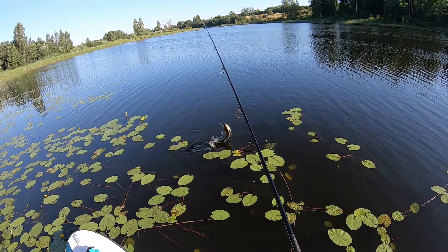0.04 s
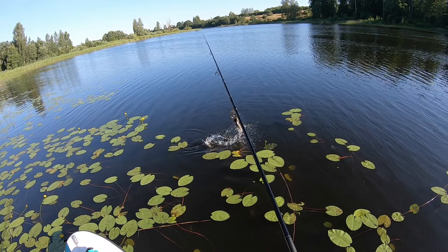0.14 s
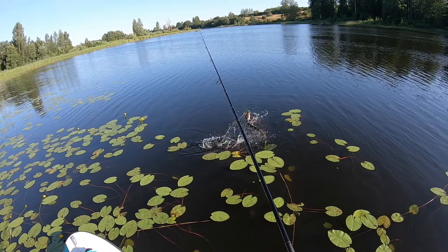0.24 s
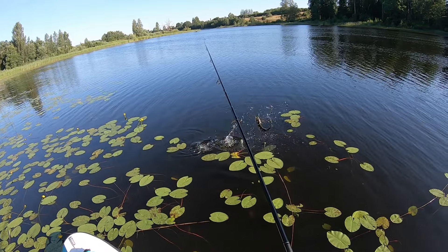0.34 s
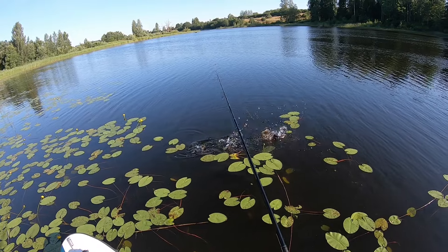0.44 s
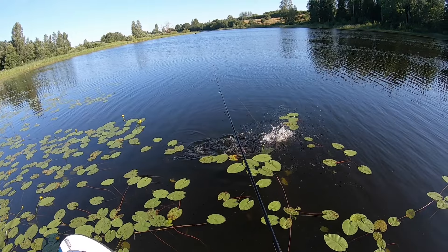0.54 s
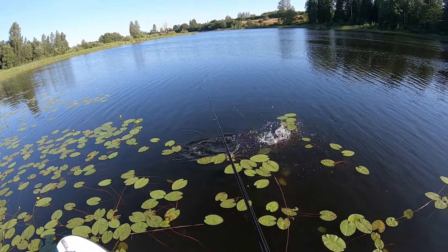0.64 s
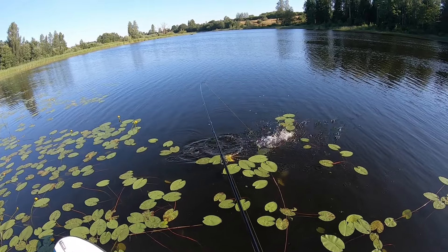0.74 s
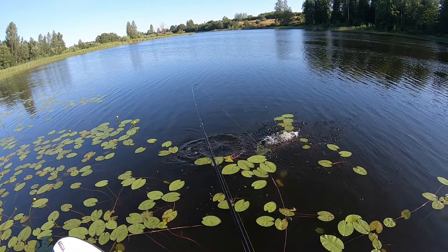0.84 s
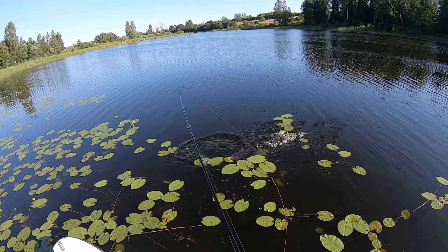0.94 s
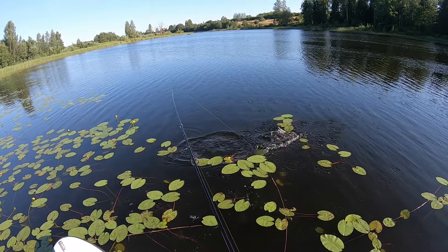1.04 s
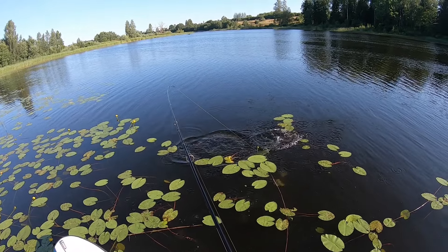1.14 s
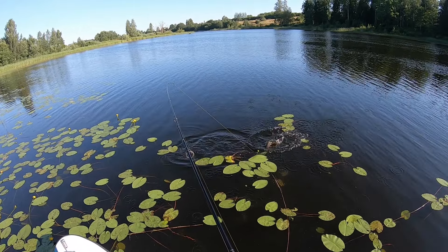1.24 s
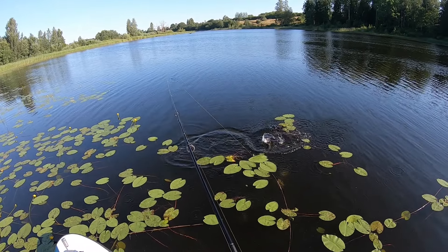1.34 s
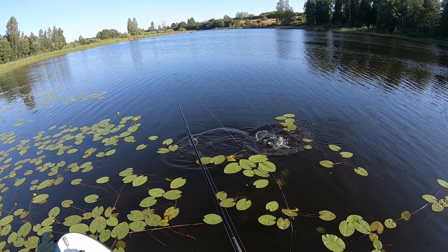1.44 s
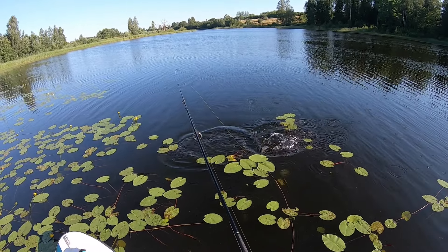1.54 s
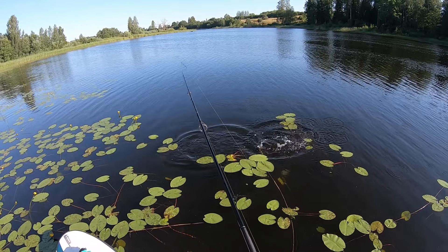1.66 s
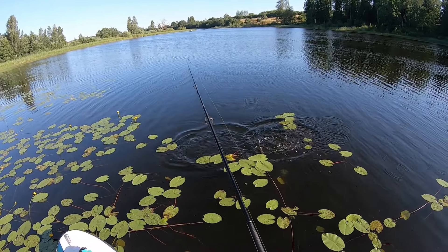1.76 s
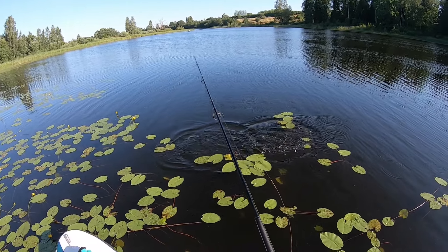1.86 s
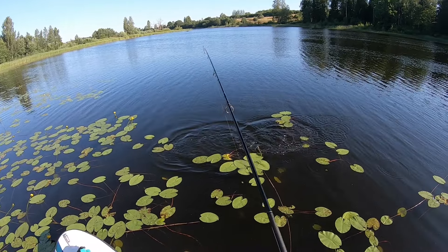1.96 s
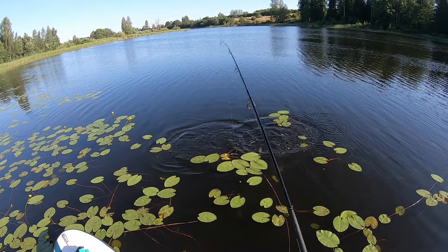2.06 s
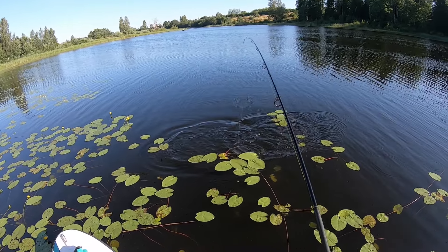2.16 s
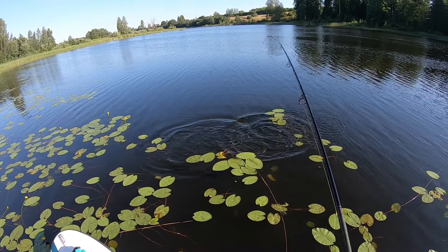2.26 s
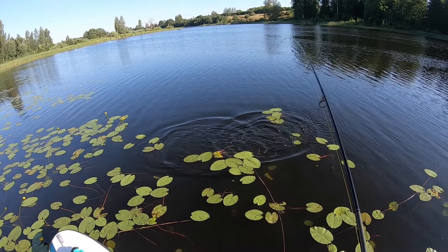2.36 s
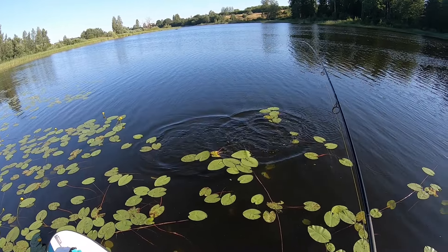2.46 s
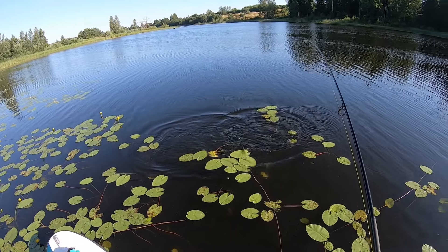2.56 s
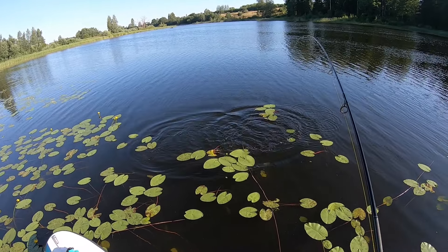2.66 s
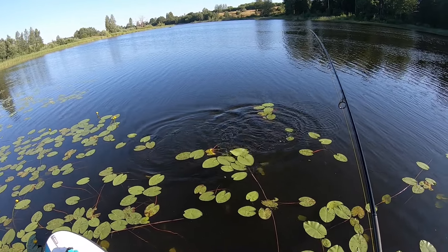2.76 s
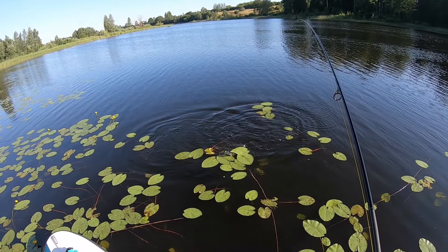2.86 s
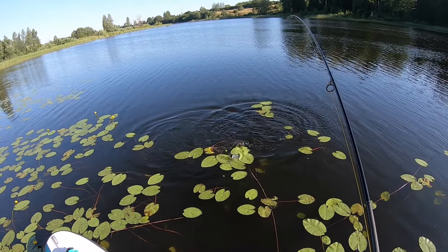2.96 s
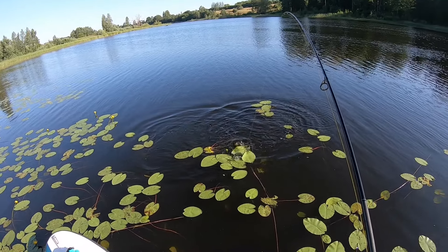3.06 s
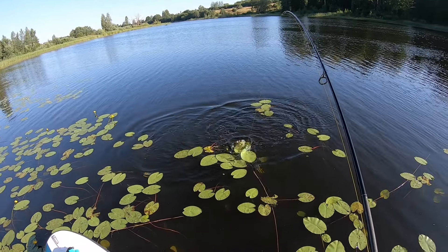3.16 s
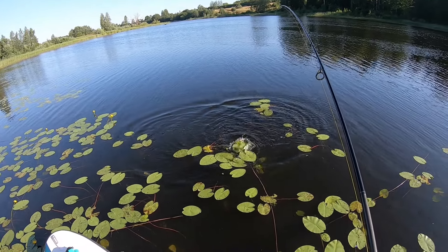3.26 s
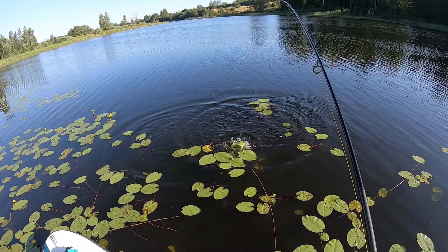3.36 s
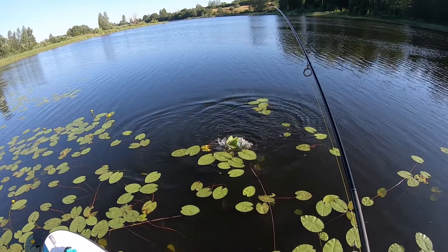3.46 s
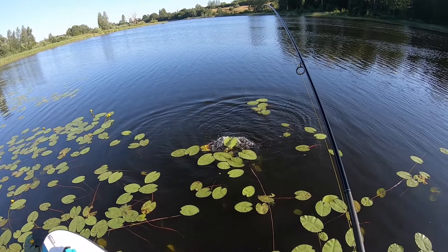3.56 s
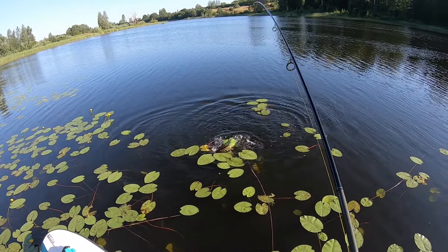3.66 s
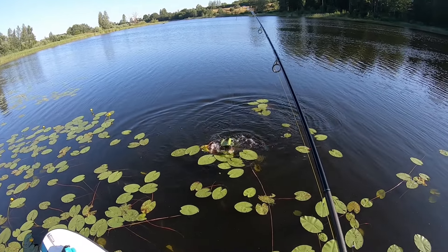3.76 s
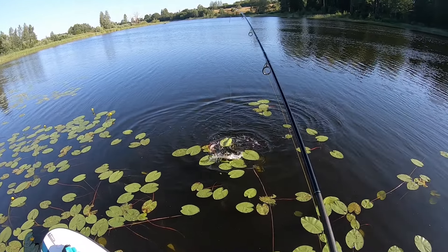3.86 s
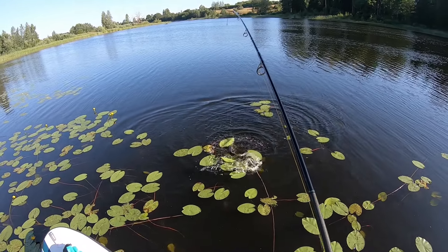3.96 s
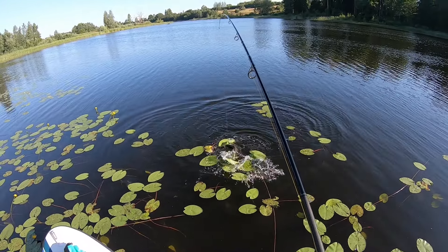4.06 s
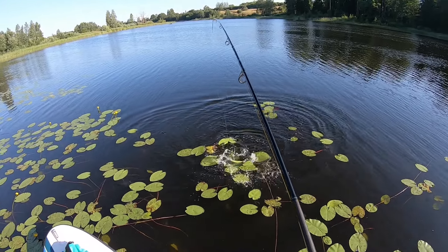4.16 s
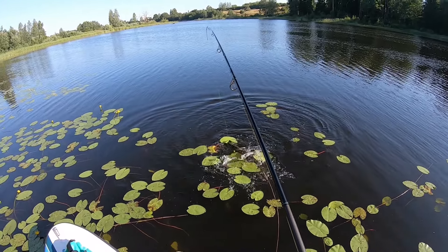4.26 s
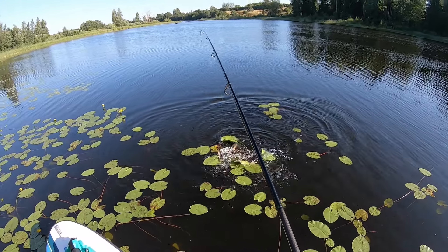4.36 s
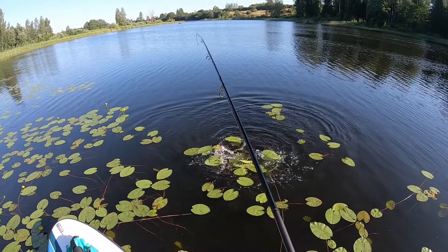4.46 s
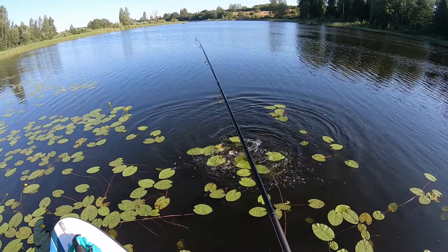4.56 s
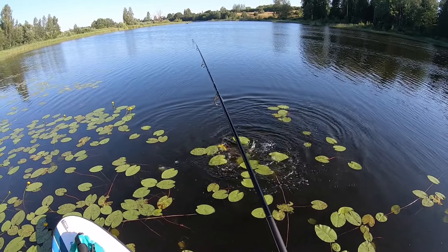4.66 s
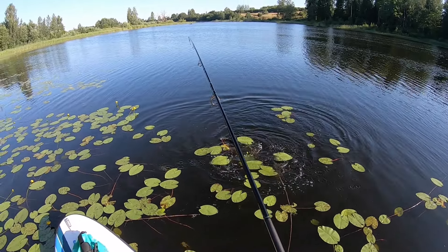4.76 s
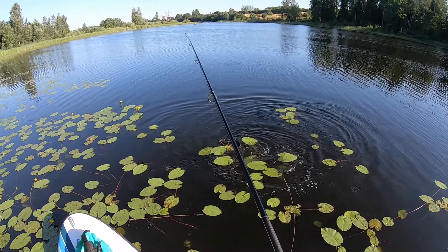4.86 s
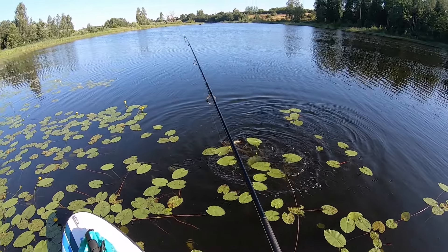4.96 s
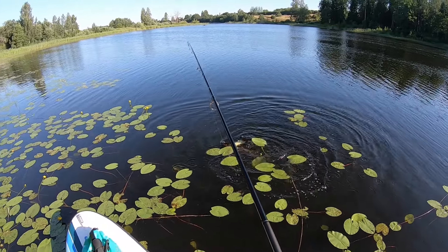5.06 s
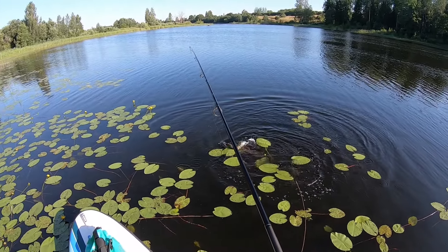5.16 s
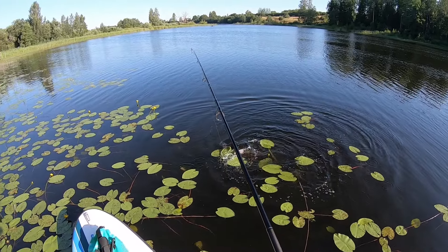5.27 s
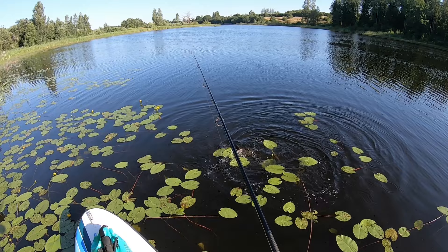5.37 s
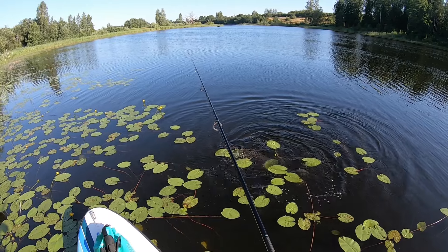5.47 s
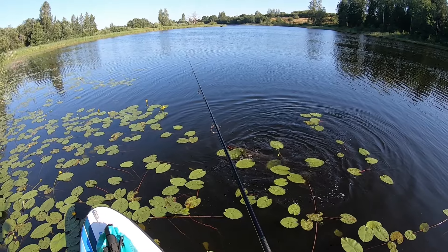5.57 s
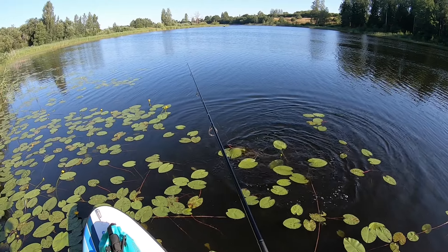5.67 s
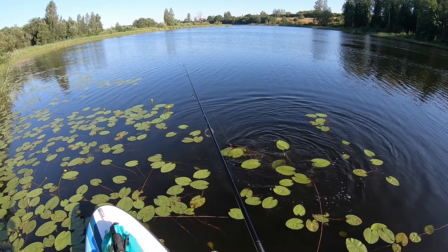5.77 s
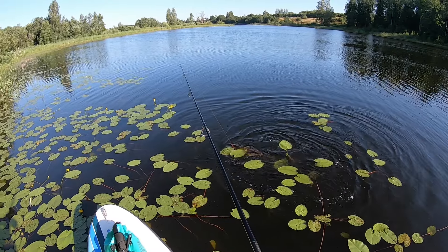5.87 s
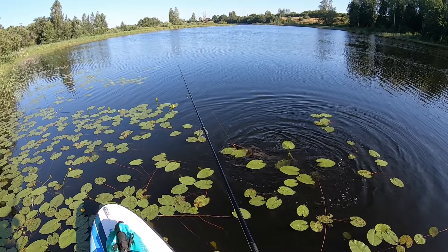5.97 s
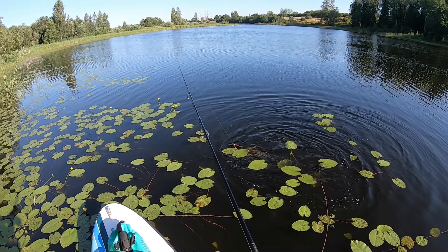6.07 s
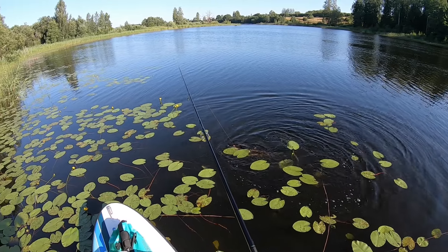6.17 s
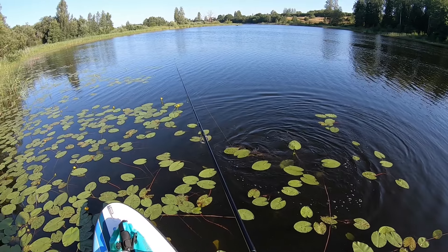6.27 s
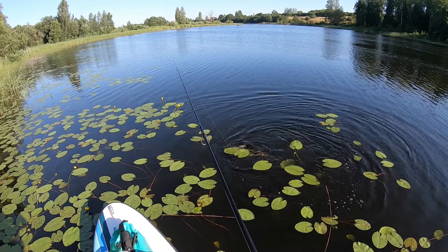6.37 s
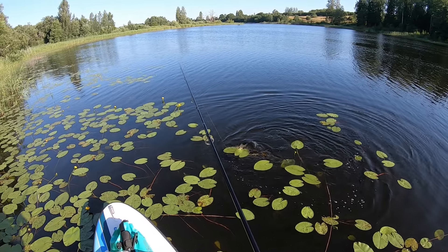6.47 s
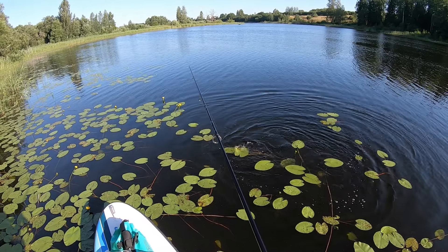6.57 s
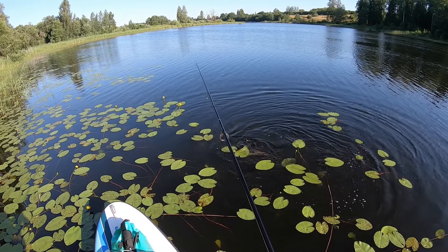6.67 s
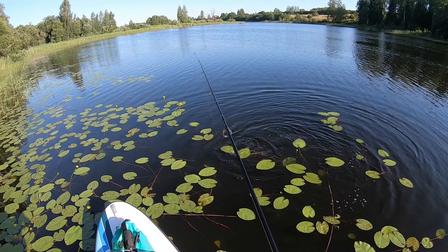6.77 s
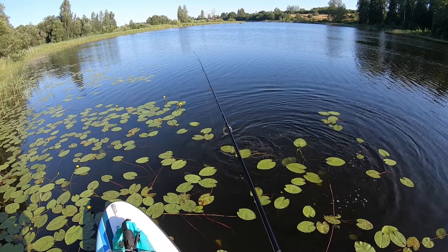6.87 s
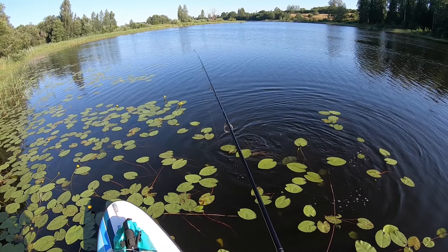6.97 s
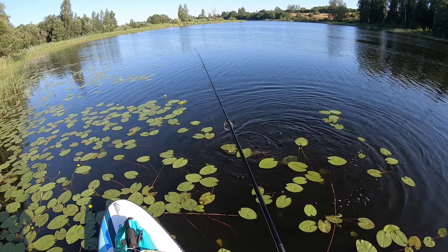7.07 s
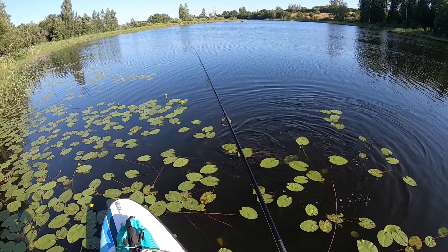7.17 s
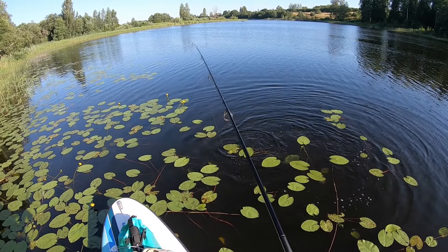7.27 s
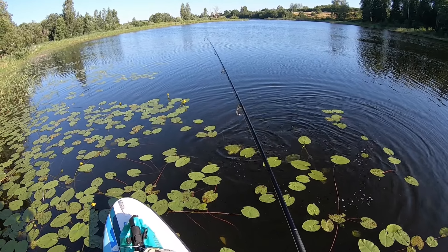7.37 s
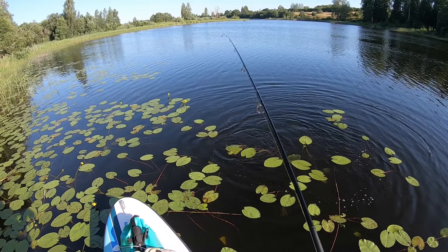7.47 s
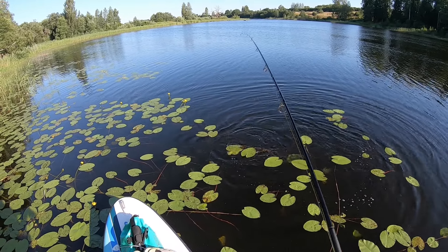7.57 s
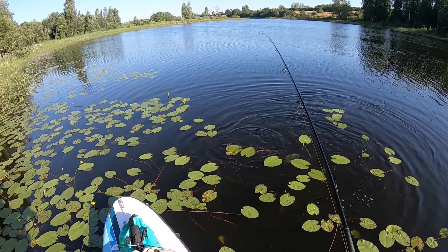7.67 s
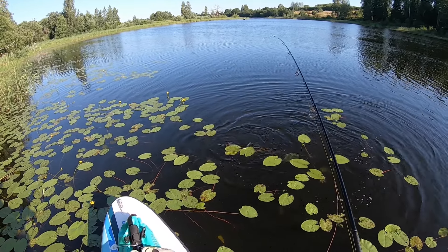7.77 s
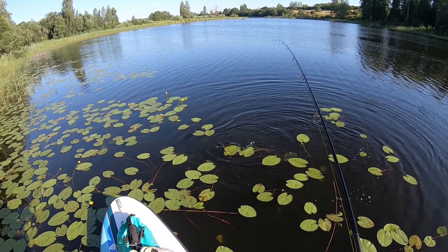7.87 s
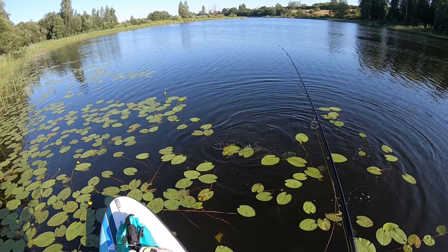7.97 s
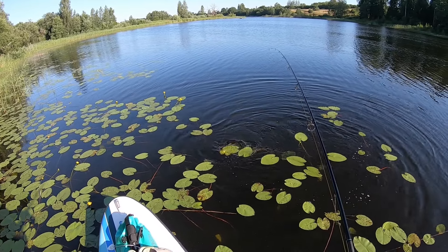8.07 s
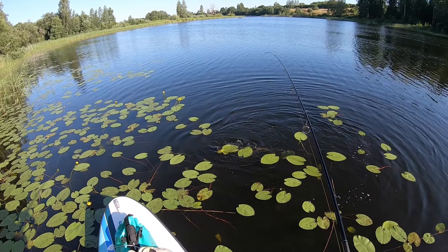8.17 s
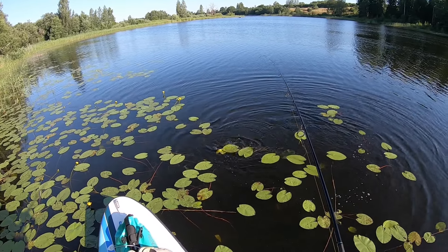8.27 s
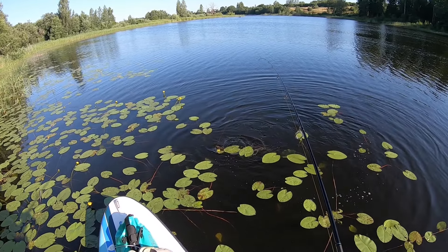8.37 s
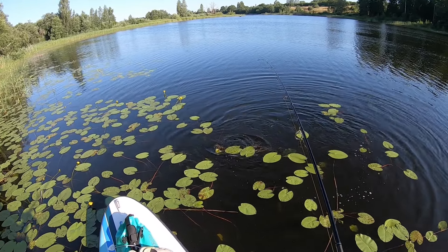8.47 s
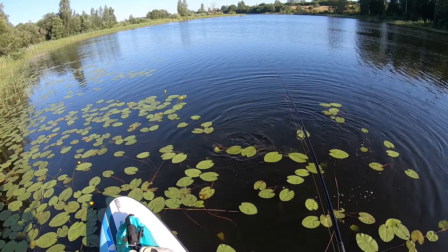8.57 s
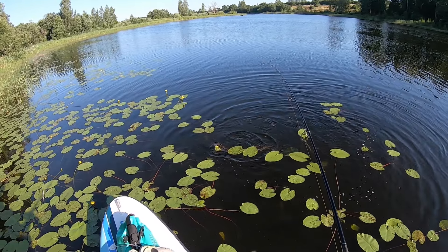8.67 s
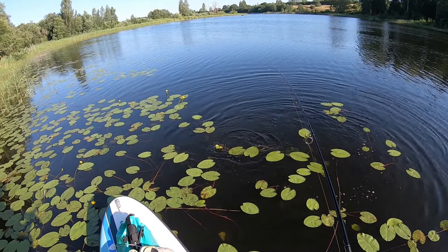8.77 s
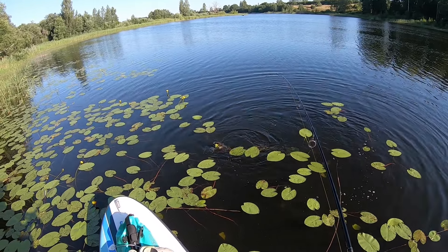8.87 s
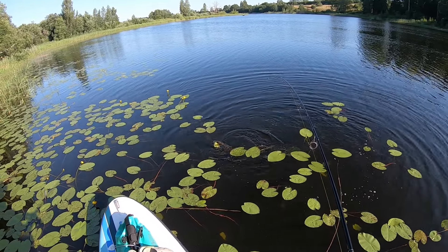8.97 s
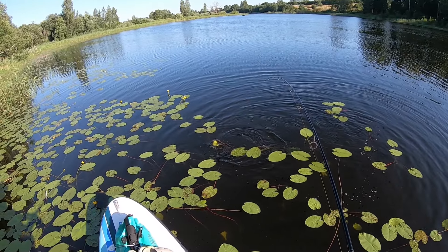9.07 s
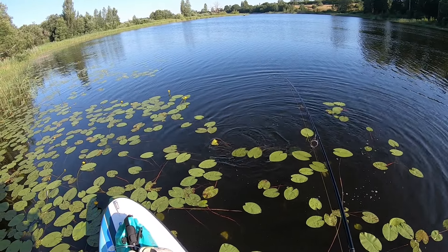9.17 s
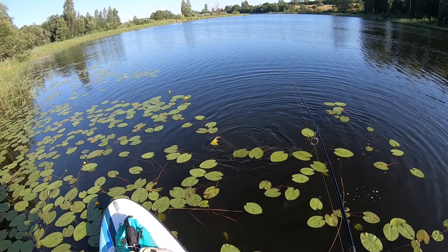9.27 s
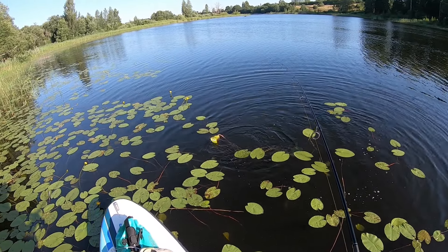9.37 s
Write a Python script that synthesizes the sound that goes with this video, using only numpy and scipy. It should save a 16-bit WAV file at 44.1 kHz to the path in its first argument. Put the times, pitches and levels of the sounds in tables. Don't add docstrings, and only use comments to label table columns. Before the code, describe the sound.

Outdoor stereo capture a few metres from a struggling fish: sharp splash and deep slosh first, spray raining back, bubbles rising. A lull with faint bird chirps follows, then renewed churning, wet pad slaps and hollow plops. The water calms to isolated ticks and drips, with thin far whistles. A soft low hum, distant traffic and slight wind rumble lie underneath, with no room echo.

```python
import sys
import numpy as np
from scipy import signal
from scipy.fft import rfft, irfft, next_fast_len
from scipy.io import wavfile
from scipy.ndimage import uniform_filter1d

SR = 44100
rng = np.random.default_rng(int(sys.argv[2]) if len(sys.argv) > 2 else 0)


def unload_wav(signal):
    wavfile.write(
        sys.argv[1],
        SR,
        np.round(np.clip(np.atleast_2d(signal).T, -1, 1) * 32767).astype(np.int16),
    )


def voltage_ratio(level):
    return 10 ** (np.asarray(level, float) / 20)


N = 415422


def evened(x):
    return x / np.sqrt(np.mean(x ** 2) + 1e-20)


def read(points, hz):
    f, value = np.transpose(points)
    return np.interp(np.log(hz + 1), np.log(f + 1), value)


def along(rows, axis=1):
    rows = np.array(rows)
    return np.interp(np.arange(N) / SR, rows[:, 0], rows[:, axis])


def colour(x, response):
    size = next_fast_len(N + 4096)
    return irfft(rfft(x, size) * response(np.fft.rfftfreq(size, 1 / SR)), size)[..., :N]


def noise(points):
    return evened(colour(rng.standard_normal(N), lambda hz: voltage_ratio(read(points, hz))))


def add(mix, s, sound):
    part = mix[round(s * SR):][:len(sound)]
    part += sound[:len(part)]


def spread(mid, side):
    lean_db = -2.5
    return np.array([mid + side, mid - side]) * voltage_ratio(np.array([[lean_db / 2], [-lean_db / 2]]))


# time_s, level_db
AIR_LEVEL = [(0, -73.5), (2.2, -63), (2.8, -68.5), (5.9, -68), (6.6, -65), (7.3, -68.5), (9.42, -67.5)]
# pitch_hz, density_db
AIR_SUM = [(90, -50.5), (120, -27.5), (150, -8.5), (230, -17.5), (330, -20.5), (430, -25), (620, -25),
           (800, -19.5), (1000, -24), (1920, -28), (4500, -33.5), (8480, -46), (15500, -66.5)]
# pitch_hz, density_db
AIR_DIFFERENCE = [(53, -82.5), (90, -45.5), (183, -5), (288, -15), (321, -22.5), (846, -11), (1030, -13.5),
                  (1920, -20.5), (15500, -49.5)]


def air():
    side_db = 2
    swell = voltage_ratio(.6 * noise([(0, 0), (3, -3), (10, -40)]))
    return voltage_ratio(along(AIR_LEVEL)) * swell * spread(noise(AIR_SUM), voltage_ratio(side_db) * noise(AIR_DIFFERENCE))


# time_s, level_db
ENGINE_LEVEL = [(0, -62.5), (.3, -60), (.9, -68.5), (2.2, -68), (4.8, -69.5), (6.6, -62), (9.42, -64.5)]


def hum():
    pitch_hz, width_hz, steady_share = 185.5, 9.0, .55
    r = np.exp(-np.pi * width_hz / SR)
    fuzz = signal.lfilter([1], [1, -r], rng.standard_normal(N) + 1j * rng.standard_normal(N))
    fuzz = steady_share + (1 - steady_share) * fuzz / np.std(fuzz)
    tone = evened((fuzz * np.exp(2j * np.pi * pitch_hz * np.arange(N) / SR)).real)
    return spread(voltage_ratio(along(ENGINE_LEVEL)) * tone, 0)


# time_s, level_db
WIND_LEVEL = [(0, -73), (.23, -49.5), (.63, -51.5), (.81, -62), (2.0, -66.5), (4.0, -68.5), (4.6, -68),
              (9.42, -72.5)]
# pitch_hz, density_db
GUST_SPECTRUM = [(12, 1), (25, 2), (50, -7.5), (75, -16), (110, -23.5), (170, -68)]


def wind():
    side_db = 9
    push = noise(GUST_SPECTRUM)
    lumps = voltage_ratio(4.2 * noise([(0, -1.5), (6, 4.5), (16, -51.5)]))
    mid = 0.96 * noise(GUST_SPECTRUM) - 0.107 * push
    return voltage_ratio(along(WIND_LEVEL)) * lumps * spread(mid, voltage_ratio(side_db) * push)


# time_s, level_db
ROAD_LEVEL = [(0, -75), (1.8, -76.5), (2.3, -73.5), (5.9, -78), (6.7, -70), (7.6, -76.5), (8.4, -85),
              (8.9, -73), (9.42, -74.5)]


def road():
    side_db = -9.5
    band = [(200, -30), (260, 0.5), (370, 6.5), (480, -36.5)]
    return voltage_ratio(along(ROAD_LEVEL)) * spread(noise(band), voltage_ratio(side_db) * noise(band))


def ring(hz, t60, rise, phase):
    t = np.arange(int(.7 * t60 * SR) + 2) / SR
    shape = (1 - np.exp(-.8 * hz * t)) ** 2 * voltage_ratio(-60 * t / t60)
    return shape * np.cos(2 * np.pi * hz * (t + rise * t * t / t60 / 2) + phase)


# pitch_hz, density_db
WATER_SPECTRUM = [(120, -49.5), (200, -13.5), (401, -9), (472, -10.5), (588, -8), (706, -9.5), (863, -7),
                  (1900, -9.5), (3530, -7.5), (5180, -20.5), (6220, -21.5), (8030, -34.5), (9820, -28),
                  (13700, -51), (15800, -58.5)]


def cloud(lo_hz, hi_hz, per_s, cycles, spread_db, smooth, count=22):
    out = np.zeros(N)
    for hz in np.geomspace(lo_hz, hi_hz, count):
        at = rng.random(2500) * 2500 * count / per_s
        size = rng.exponential(1, 2500)
        rise, ring_share = rng.random(2)
        hits = np.bincount((at * SR).astype(int), voltage_ratio(spread_db * np.minimum(size, 4)), N)[:N]
        grain = ring(hz, (2.24 + 3 * ring_share) * cycles / hz, 1.7 * rise ** 3, 0)
        out += signal.oaconvolve(hits, grain / np.linalg.norm(grain) * np.sqrt(hz))[:N]
    mixed = (1 - smooth) * evened(out) + smooth * rng.standard_normal(N)

    def water_band(hz):
        inside = 1 / np.sqrt((1 + (lo_hz / (hz + 1)) ** 12) * (1 + (hz / hi_hz) ** 12))
        return inside * voltage_ratio(read(WATER_SPECTRUM, hz))
    return evened(colour(mixed, water_band))


# low_hz, high_hz, grains_per_s, ring_cycles, size_spread_db, smooth_share
BUBBLE_CROWDS = [
    (200, 1500, 400, 9.0, 1.8, .58),
    (1500, 5000, 2300, 7.0, 3.3, .46),
    (5000, 15000, 4000, 4.0, 5.0, .45),
]
# time_s, patter_db, gurgle_re_patter_db
STIRRED_WATER = [(.03, -70, -4), (.1, -62, 4), (.45, -53, 1), (1.2, -69, 6.5), (1.69, -52, -11),
                 (1.95, -68.5, 5.5), (2.05, -100, 6), (2.87, -85, -10), (2.92, -60, 4), (3.4, -63.5, 11.5),
                 (3.77, -58, -3), (4.04, -46.5, -7), (4.35, -49, -3.5), (4.7, -52.5, -11), (4.88, -66, -7),
                 (5.09, -72, -31), (5.5, -60.5, 2), (5.67, -86, 17)]
# peak_s, patter_db, t60_s, fineness_db (more spray, less gurgle)
TAIL_SLAPS = [(.075, -55, 0.16, -4.5), (0.152, -38.5, 0.42, 0), (0.249, -39.5, 0.41, -2.5),
              (.411, -54.5, .1, 9), (1.75, -57.5, 0.33, 11.5), (3.022, -58, 0.11, 5), (3.633, -55, .15, 9),
              (.7, -58, 0.27, -1.5), (3.317, -53.5, 0.092, -1.5), (4.464, -61, 0.14, 5),
              (0.504, -41, 2.5, -3.5), (0.56, -35, 0.099, 2), (0.817, -44.5, 0.085, -1),
              (1.012, -50, 1.05, -4), (1.327, -54.5, 0.21, -2), (1.482, -54, 0.061, -6),
              (2.978, -51, 0.48, 0.5), (3.113, -41.5, 0.1, -6), (3.193, -45.5, 0.54, -7),
              (3.454, -46, 0.82, -7.5), (3.841, -53, 2.1, -3), (4.103, -36, 0.25, -1.5),
              (4.385, -40.5, 0.5, 1.5), (4.699, -57, 0.47, -10.5), (5.16, -45, 0.2, -3.5),
              (5.283, -44.5, 0.16, 6), (5.361, -55.5, 0.9, 6), (5.621, -68, 0.29, -11.5),
              (6.661, -67.5, 0.31, 6.5), (7.912, -60.5, 0.047, 2), (7.989, -56.5, 0.4, -4.5),
              (9.313, -65, 0.28, -6.5)]


def churn():
    rise_db_per_s, clump_db = 402, 2.7
    slap_gurgle_db, slap_spray_db, stir_spray_db, spray_gain = -4, -8.5, -11, 0.71
    gurgle, patter, spray = (cloud(*row) for row in BUBBLE_CROWDS)
    clumps = voltage_ratio(clump_db * noise([(6, -20), (16, 0), (80, -7), (250, -40)]))
    patter, spray = evened(patter * clumps), evened(spray * clumps)

    time = np.arange(N) / SR
    stir = voltage_ratio(along(STIRRED_WATER)) * (time < STIRRED_WATER[-1][0])
    t = time[::32]
    s, db, t60, fine_db = np.transpose(TAIL_SLAPS)[..., None]
    throw_db = rise_db_per_s * (t - s)
    fall_db = 60 * (s - t) / np.minimum(t60, 2)
    slap_db = db + np.minimum(throw_db, fall_db)

    def slaps(extra_db):
        return np.interp(time, t, np.linalg.norm(voltage_ratio(slap_db + extra_db), axis=0))
    deep = np.hypot(voltage_ratio(along(STIRRED_WATER, axis=2)) * stir, slaps(slap_gurgle_db - fine_db))
    fine = np.hypot(voltage_ratio(stir_spray_db) * stir, slaps(slap_spray_db + spray_gain * fine_db))
    return np.hypot(stir, slaps(0)) * patter + deep * gurgle + fine * spray


def click_tone(hz):
    click_db = -2
    body = 1 / np.sqrt(1 + (5500 / (hz + 1)) ** 8)
    return voltage_ratio(read(WATER_SPECTRUM, hz) - read(WATER_SPECTRUM, 6400)) * (voltage_ratio(click_db) * (hz > 1200) + body)


def rings(rows, random_phase=True):
    out, clicks = np.zeros(N), np.zeros(N)
    for s, db, hz, t60, rise in rows:
        phase = rng.uniform(0, 2 * np.pi) if random_phase else 0
        sound = voltage_ratio(db) * ring(hz, t60, rise, phase)
        add(out, s, sound)
        clicks[round(s * SR) + 4] += abs(sound).max() * (hz > 2050)
    return out + colour(clicks, click_tone)


DROP_RISE = 0.048

# start_s, level_db, pitch_hz, t60_s, rise_share
BODY_SLOSHES = [
    (0.086, -38, 171, 0.11, 0.09),
    (.235, -24.5, 164.7, 0.066, 0.23),
    (0.564, -29.5, 109, 0.12, 0.67),
    (3.44, -39, 150, 0.078, 0.19),
]


def sloshes():
    return rings(BODY_SLOSHES)


# start_s, level_db, pitch_hz
SPRAY_DROPS = [(.086, -36, 2170), (.121, -34, 2670), (0.14, -17.5, 1690), (.142, -29, 3540),
               (.161, -24.5, 2067), (.194, -35, 3273), (.202, -28, 3070), (.246, -28, 4370),
               (.42, -32.5, 2500), (.496, -36, 5641), (.532, -23.5, 2650), (0.698, -29.5, 3240),
               (.703, -26.5, 1730), (.741, -32, 4280), (0.824, -29, 2700), (1.002, -28, 1630),
               (1.822, -36.5, 2480), (3.109, -33.5, 2370), (3.214, -28, 3050), (3.315, -35.5, 3570),
               (3.34, -37, 1600), (3.459, -36, 3420), (3.478, -35, 3400), (3.57, -34.5, 3340),
               (3.699, -36.5, 3520), (3.834, -34, 3720), (4.097, -36, 6100), (4.121, -25, 1620),
               (4.129, -19, 1033), (4.391, -23.5, 2570), (4.437, -28.5, 3320), (4.633, -32.5, 3600),
               (4.789, -38.5, 2300), (4.975, -46, 1600), (5.159, -37, 1600), (5.18, -40, 5684),
               (5.21, -38, 2680), (5.271, -32, 3160), (5.287, -33, 4608), (5.522, -41.5, 3500)]


def spatter():
    t60_s = 0.013
    return rings([(*row, t60_s, DROP_RISE) for row in SPRAY_DROPS], random_phase=False)


# start_s, level_db, pitch_hz, t60_s
HARD_DROPS = [(.0865, -5.5, 2980, 0.0016), (.087, -24.5, 4040, 0.0043), (.133, -3, 1700, 0.0015),
              (.142, -17, 4870, 0.0041), (.543, -14.5, 3140, 0.0024), (.56, -5.5, 6500, 0.002),
              (.561, 14.5, 2870, 0.0014), (1.082, -18, 2760, 0.0039), (1.44, -25, 3970, 0.0035),
              (1.469, -15, 3230, 0.0033), (2.919, -32, 3670, 0.0032), (2.985, -21.5, 3540, 0.0037),
              (3.257, -5.5, 1800, 0.0019), (3.42, -25.5, 2940, 0.0019), (4.379, -12.5, 3870, 0.002),
              (4.396, -4, 3470, 0.0018), (4.464, -32, 5970, .0044), (4.631, -16, 4300, 0.0018),
              (4.697, -22, 2010, 0.0039), (4.705, -22, 3000, 0.0042), (5.12, -22, 3500, 0.0023),
              (5.161, 1.5, 1860, 0.0017), (5.165, -10, 2550, 0.0037), (6.619, -39.5, 6600, 0.0025),
              (6.655, -33, 6100, 0.0022), (6.656, -26, 3170, 0.0043), (7.888, -33.5, 4640, 0.003),
              (7.92, -33, 1880, 0.0073), (7.988, -4.5, 1820, 0.0018), (8.219, -33, 3350, 0.0057)]


def drops():
    return rings([(*row, DROP_RISE) for row in HARD_DROPS])


# start_s, level_db, pitch_hz, t60_s, rise_share
LARGE_BUBBLES = [(.122, -28, 1600, 0.035, .1), (.795, -35.5, 220, 0.25, 9.7), (.99, -38.5, 744, 0.12, 0.33),
                 (1.127, -38.5, 543, 0.079, 2.8), (1.473, -34.5, 710, 0.05, 2),
                 (1.47, -46.5, 484, 0.21, 1.04), (1.664, -41, 739, 0.15, 1.4), (2.938, -34, 444, 0.11, 1.3),
                 (3.178, -27.5, 231, 0.066, 3.4), (3.18, -25, 449, 0.057, 0.65),
                 (3.39, -34.5, 323, 0.12, 1.2), (3.452, -40, 806, 0.047, 2.2),
                 (3.635, -35.5, 444, 0.13, 4.1), (3.638, -34.5, 356, 0.12, 0.4),
                 (3.92, -24.5, 477, 0.052, 2.56), (3.943, -36, 1170, 0.084, 2.3),
                 (4.128, -19, 473, 0.06, 0.05), (4.241, -32.5, 522, 0.062, 0.77),
                 (4.66, -46.5, 503, 0.11, 2.3), (5.163, -37, 311, 0.2, 2.14), (7.902, -39, 784, 0.065, .9),
                 (7.984, -36, 1160, 0.031, 0.36)]


def bubbles():
    return rings(LARGE_BUBBLES)


# start_s, level_db, pitch_hz, t60_s
AIR_PLOPS = [(0.132, -13, 1620, 0.014), (0.235, -13, 410, 0.017), (0.28, -23, 960, 0.048),
             (.32, -17.5, 420, 0.014), (1.306, -38, 970, 0.069), (.558, -15.5, 836, 0.018),
             (.644, -20.5, 428, 0.043), (0.701, -26.5, 640, 0.032), (0.738, -13.5, 304, 0.027),
             (.871, -24, 853, 0.019), (1.281, -38, 1113, 0.047), (1.487, -24, 1160, 0.018),
             (1.73, -45.5, 820, 0.1), (1.787, -41, 954, 0.044), (3.07, -22.5, 493, 0.021),
             (3.107, -25.5, 1320, 0.02), (3.107, -26, 204, 0.032), (3.225, -23.5, 326, 0.032),
             (3.237, -28.5, 537, 0.035), (3.503, -23, 462, 0.045), (4.097, -9, 693, 0.022),
             (4.351, -35, 533, 0.04), (4.462, -22, 1130, 0.011), (4.511, -37.5, 1194, .1),
             (4.575, -19.5, 950, 0.012), (4.7, -46, 637, .044), (5.141, -18.5, 793, 0.016),
             (7.914, -26.5, 1045, 0.02), (5.51, -49.5, 960, 0.14), (8.034, -40.5, 428, 0.041)]


def plops():
    rise_per_s = 2.5
    return rings([(*row, rise_per_s * row[-1]) for row in AIR_PLOPS])


# start_s, level_db, pitch_hz
WET_SMACKS = [(0.246, -21.5, 5850), (.204, -13, 1350), (.245, -8.5, 1250), (.74, 2.5, 580),
              (2.337, -42, 3060), (2.983, -14, 915), (3.11, -19.5, 3280), (3.185, -25, 1290),
              (3.255, -19.5, 1440), (3.442, -27, 3500), (3.835, -23.5, 2480), (4.069, -26, 5460),
              (4.097, -23, 980), (4.218, -13, 1010), (4.242, -15.5, 1570), (4.387, -24, 6250),
              (4.556, -21.5, 3030), (4.726, -20, 810), (5.139, -17, 1150), (5.162, -19, 3180),
              (5.062, -38.5, 2100), (5.27, -21.5, 1090), (5.285, -27.5, 3800), (5.019, -38.5, 2400),
              (5.294, -28, 3270), (5.613, -32, 2980), (5.621, -27, 1800), (6.817, -40.5, 3037),
              (8.225, -36.5, 2000), (9.113, -43.5, 3100)]


def smacks():
    t60_s = 0.0074
    return rings([(*row, t60_s, DROP_RISE) for row in WET_SMACKS])


# start_s, level_db, pitch_hz
RINGING_DRIPS = [(0.243, -21, 2780), (.408, -35.5, 3250), (0.627, -28.5, 1770), (1.405, -28, 3270),
                 (1.565, -41, 3700), (1.567, -38, 2070), (1.627, -31, 2550), (1.684, -32.5, 3020),
                 (1.715, -32, 2880), (2.568, -50, 2710), (2.877, -44, 2170), (3.932, -32.5, 1270),
                 (4.098, -27, 3720), (4.93, -42.5, 2700), (5.12, -32, 1200), (5.484, -42, 4060),
                 (5.611, -43.5, 1400), (5.63, -50, 1500), (6.536, -51, 4260), (6.574, -49, 3250),
                 (6.651, -43.5, 2320), (4.85, -46.5, 3440), (6.817, -51.5, 5000), (6.864, -50, 4000),
                 (7.978, -36, 2190), (7.98, -34, 1500), (8.006, -39.5, 2160), (8.031, -43, 2890),
                 (9.106, -51, 2140)]


def drips():
    cycles = 48
    return rings([(*row, cycles / row[2], DROP_RISE) for row in RINGING_DRIPS])


# start_s, level_db, pitch_hz
FINE_TICKS = [
    (.258, -18, 3470),
    (.407, -37, 9030),
    (3.33, -33, 3000),
    (3.768, -28, 2700),
    (4.407, -20, 3500),
    (4.658, -33, 5500),
    (7.893, -49, 7000),
    (7.904, -47, 6500),
]


def ticks():
    t60_s = .004
    return rings([(*row, t60_s, DROP_RISE) for row in FINE_TICKS], random_phase=False)


# start_s, level_db, pitch_hz, t60_s, rise_share
SMALL_GURGLES = [(.393, -34, 799, 0.061, 0.27), (.446, -38, 740, .055, 0.4), (.494, -29, 1460, .015, .1),
                 (.527, -27, 780, 0.035, .1), (.526, -32, 310, 0.082, 1.5), (.545, -30.5, 360, 0.086, 1.3),
                 (.698, -26, 947, 0.017, .1), (.712, -32, 582, 0.062, 1.25),
                 (.813, -35.5, 715, 0.092, 0.33), (.905, -43, 1050, 0.046, 0.12),
                 (1.083, -36.5, 924, 0.049, 0.33), (1.155, -38.5, 810, 0.037, 0.71),
                 (1.384, -35, 1230, 0.021, .1), (1.405, -43, 1140, 0.043, .1),
                 (1.523, -40, 770, 0.048, 1.4), (1.734, -32, 1470, 0.012, .1),
                 (1.797, -43, 1410, 0.026, .3), (2.913, -35, 1500, 0.013, 3), (2.918, -53, 910, 0.11, 1.7),
                 (3.03, -37.5, 633, 0.051, 1.3), (3.135, -45, 500, 0.081, 2.5),
                 (3.453, -28, 555, 0.028, .1), (3.467, -32, 980, .04, .1), (3.488, -25.5, 935, 0.022, .1),
                 (3.54, -33, 476, 0.046, .3), (3.56, -31, 450, 0.039, 0.27), (3.598, -31.5, 480, .04, 0.26),
                 (3.938, -24, 470, 0.024, 0.44), (4.259, -35, 1485, .03, 0.24),
                 (4.493, -28.5, 1040, 0.018, 0.33), (4.675, -34, 676, 0.035, .6),
                 (4.755, -43, 794, 0.035, .6), (4.85, -50.5, 950, 0.08, 0.18),
                 (5.038, -51, 1248, 0.044, .1), (5.228, -37, 1150, 0.028, 0.59),
                 (5.417, -42.5, 1220, 0.029, .1), (5.54, -38, 1190, 0.018, .1),
                 (5.612, -41, 1200, .04, 2.6), (6.656, -49, 2040, 0.042, 1.8),
                 (8.088, -49, 830, 0.045, 0.33)]


def gurgles():
    return rings(SMALL_GURGLES, random_phase=False)


# start_s, level_db, pitch_hz
LAST_DRIPS = [(2.183, -58, 3617), (2.288, -56, 3000), (2.336, -52, 3617), (2.546, -54, 3430),
              (2.564, -58, 6503), (6.132, -56, 3100), (6.563, -57, 5900), (6.589, -53, 3100),
              (6.691, -54, 4435), (6.695, -51, 2900), (6.707, -51, 2153), (6.724, -55, 3100),
              (6.741, -53, 1937), (6.773, -56, 3400), (6.783, -53, 3180), (7.9, -55, 3014),
              (7.91, -48, 3273), (7.978, -44, 3450), (7.989, -28, 861), (7.994, -50, 6640),
              (8.011, -43, 2900), (8.025, -46, 4091), (8.034, -35, 1420), (8.128, -46, 1679),
              (8.968, -50, 1750), (9.047, -55, 3250), (9.105, -54, 4450), (9.304, -44, 2080),
              (9.336, -52, 2700)]


def trickle():
    t60_s, rise_share = 0.011, .4
    return rings([(*row, t60_s, rise_share) for row in LAST_DRIPS], random_phase=False)


# start_s, level_db, start_pitch_hz
BIRD_CHIRPS = [
    (2.045, -72, 3150),
    (2.155, -69, 3750),
    (2.262, -68, 3380),
    (2.86, -66, 3900),
    (2.155, -70, 2900),
    (2.7, -75, 3200),
]


def chirps():
    length_s, rise_share, flutter_depth, flutter_hz = 0.046, 0.46, .6, 67
    out, t = np.zeros(N), np.arange(0, length_s, 1 / SR)
    for s, db, hz in BIRD_CHIRPS:
        sweep = hz * (1 + rise_share * (t / length_s) ** 1.5)
        flutter = 1 + flutter_depth * np.sin(2 * np.pi * flutter_hz * (s + t))
        whistle = np.sin(2 * np.pi * np.cumsum(sweep) / SR)
        add(out, s, voltage_ratio(db) * np.hanning(len(t)) ** .5 * flutter * whistle)
    return out


# start_s, length_s, pitch_hz, level_db
BIRD_WHISTLES = [
    (5.735, 0.15, 4000, -72),
    (8.986, 0.12, 4450, -71),
    (9.33, 0.088, 4550, -74),
]


def whistles():
    out = np.zeros(N)
    for s, length, hz, db in BIRD_WHISTLES:
        count = int(length * SR)
        waver = 1 + 0.022 * evened(uniform_filter1d(rng.standard_normal(count), 60))
        flutter = 1 + 0.53 * evened(uniform_filter1d(rng.standard_normal(count), 300))
        whistle = np.sin(2 * np.pi * hz * np.cumsum(waver) / SR)
        add(out, s, voltage_ratio(db) * np.hanning(count) ** .5 * flutter * whistle)
    return out


# pitch_hz, level_db
PORT_LEAN = [(270, -3), (450, -7), (740, -8.5), (1220, -0.5), (2010, -1.5), (3330, -2.5), (5500, -5),
             (9080, -5.5), (13000, -4)]
# pitch_hz, lead_rad
PORT_LEAD = [(260, .1), (860, 1.2), (1980, .3), (4740, -.2), (6720, .2), (7410, .6), (8440, 4.4),
             (9130, 4.6), (10900, 6.9), (12100, 6.4)]


def ports(x):
    scatter_db, scatter_t60_s = -13, .025

    def pair(hz):
        half = voltage_ratio(read(PORT_LEAN, hz) / 2) * np.exp(.5j * read(PORT_LEAD, hz))
        both = np.array([half, 1 / half])
        both = both / np.sqrt(1 + (120 / (hz + 1)) ** 8)
        return both / np.maximum(abs(half + 1 / half) / 2, .4)
    echo = rng.standard_normal(1301) * voltage_ratio(-60 * np.arange(1301) / SR / scatter_t60_s)
    taps = np.array([echo, -echo]) / np.linalg.norm(echo)
    scattered = signal.oaconvolve(x[None], taps, axes=1)[:, :N]
    return colour(x, pair) + voltage_ratio(scatter_db) * scattered


def scene():
    splashes = churn() + sloshes() + spatter() + drops() + bubbles() + plops()
    small_water = smacks() + drips() + ticks() + gurgles() + trickle()
    birds = chirps() + whistles()
    return ports(splashes + small_water + birds) + air() + hum() + wind() + road()


def band_limit(x):
    return signal.sosfilt(signal.butter(12, 15960, fs=SR, output="sos"), x)


def record(dry):
    mix = colour(dry, lambda hz: 1 / np.sqrt(1 + (hz / 14800) ** 30))
    return band_limit(mix)


dry = scene()
out = record(dry)
unload_wav(out)
```